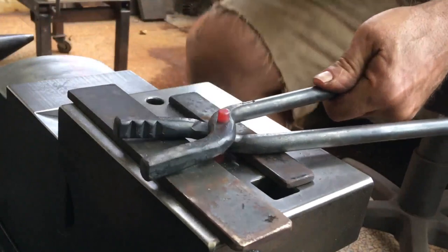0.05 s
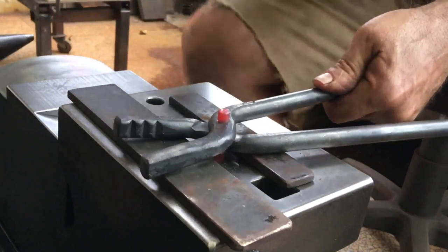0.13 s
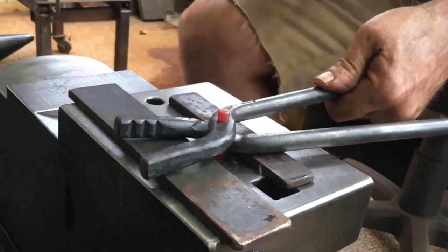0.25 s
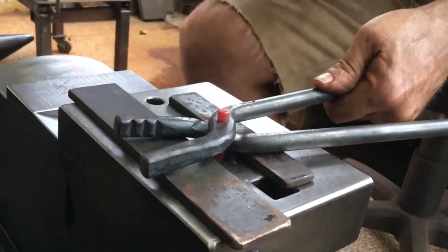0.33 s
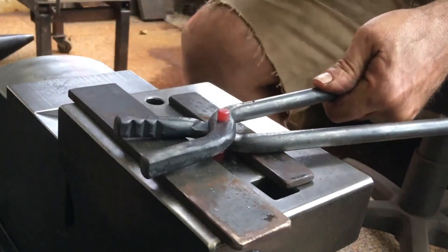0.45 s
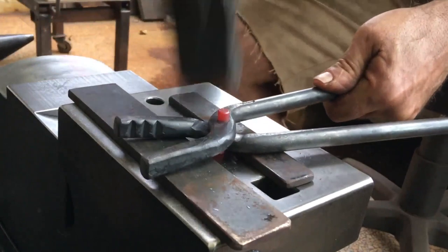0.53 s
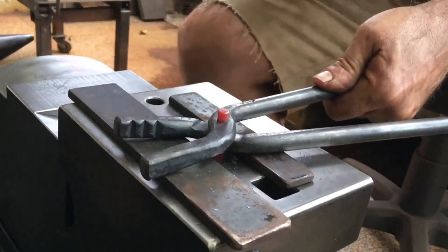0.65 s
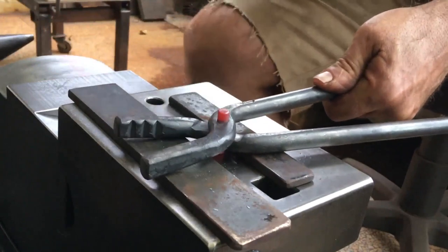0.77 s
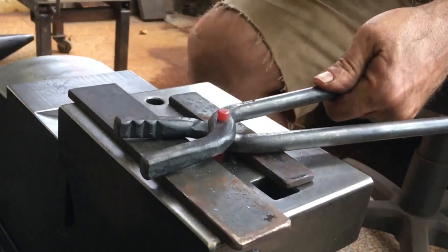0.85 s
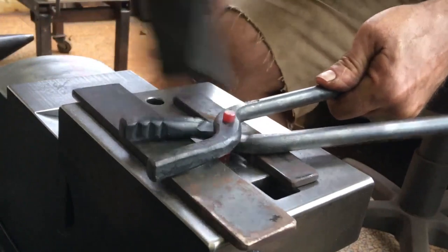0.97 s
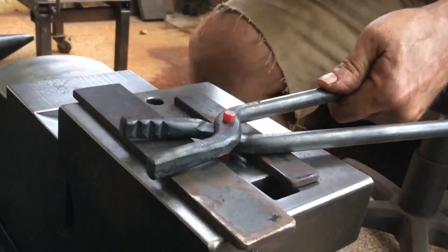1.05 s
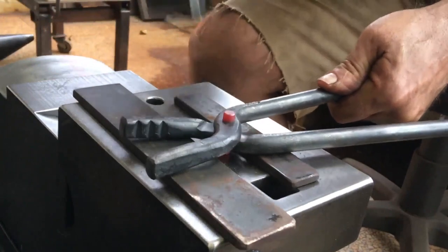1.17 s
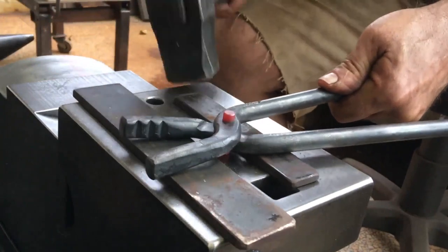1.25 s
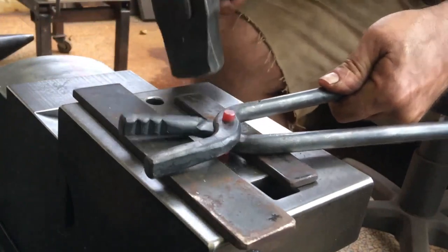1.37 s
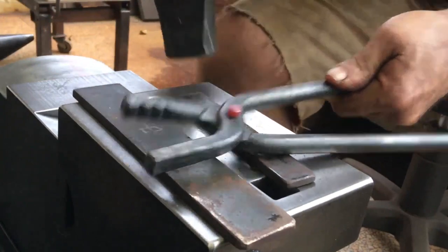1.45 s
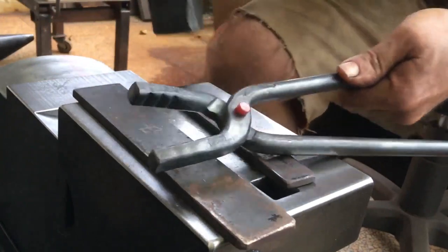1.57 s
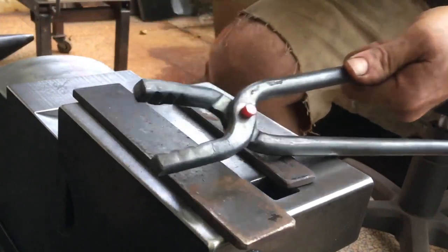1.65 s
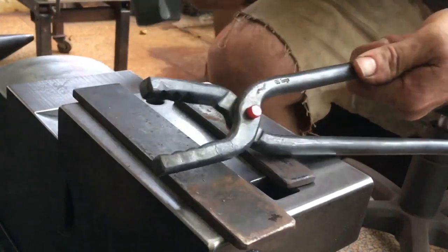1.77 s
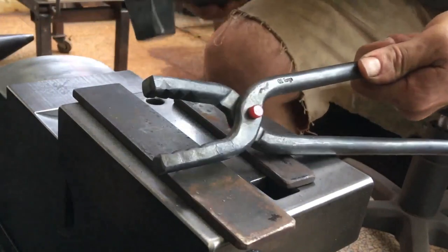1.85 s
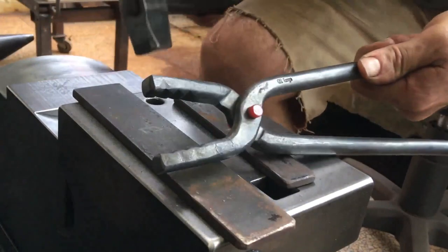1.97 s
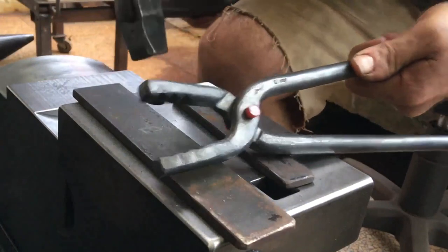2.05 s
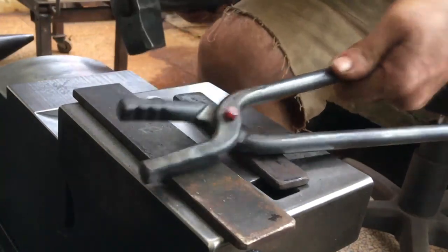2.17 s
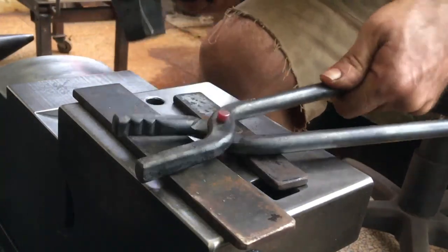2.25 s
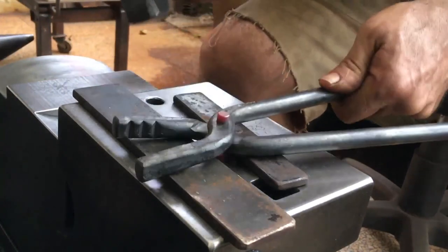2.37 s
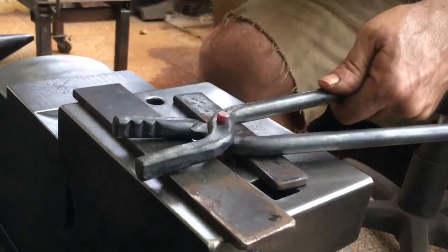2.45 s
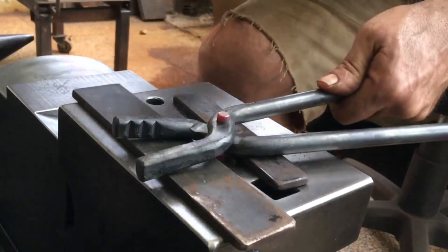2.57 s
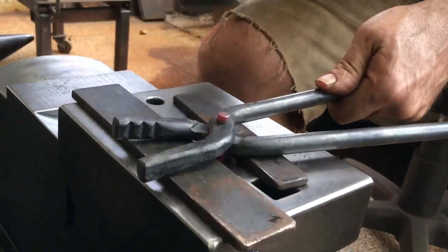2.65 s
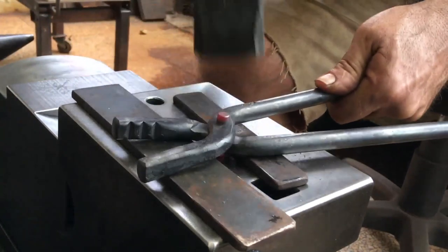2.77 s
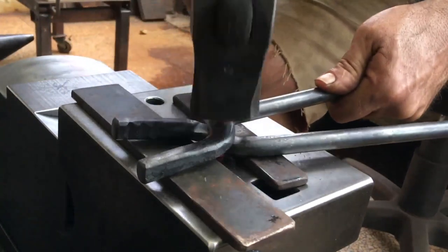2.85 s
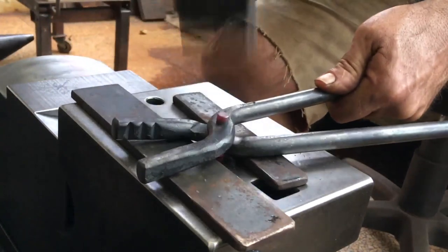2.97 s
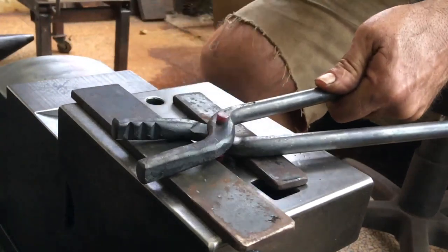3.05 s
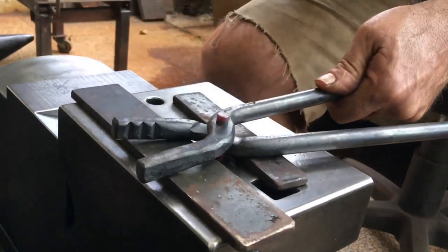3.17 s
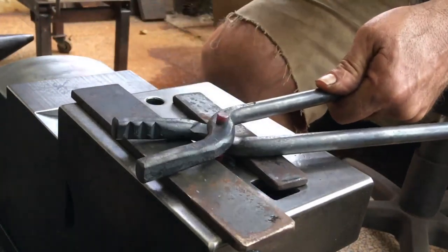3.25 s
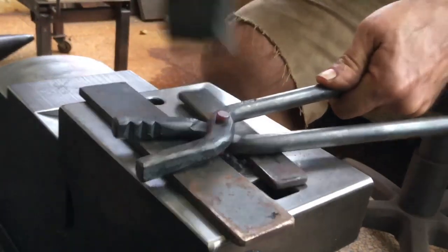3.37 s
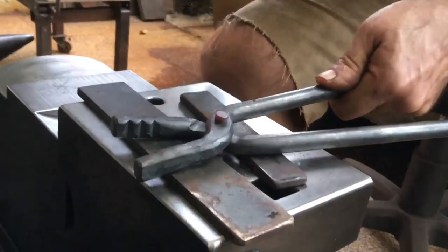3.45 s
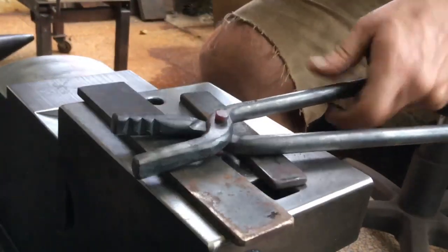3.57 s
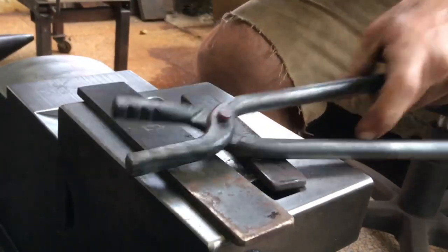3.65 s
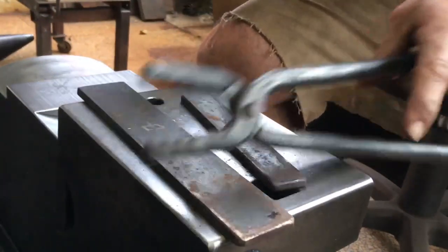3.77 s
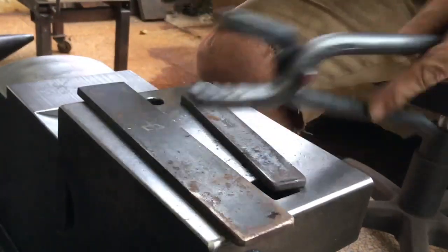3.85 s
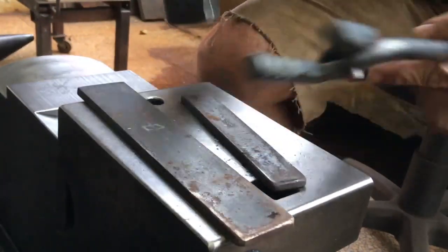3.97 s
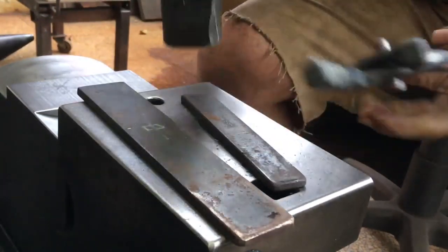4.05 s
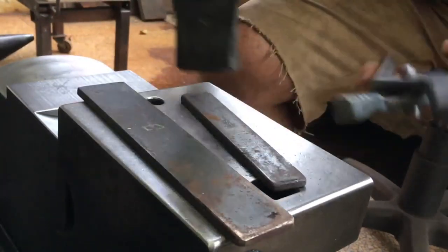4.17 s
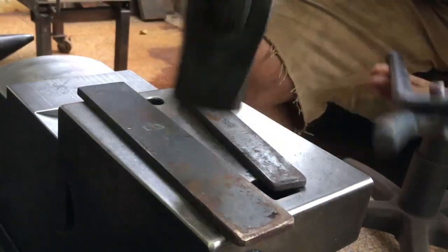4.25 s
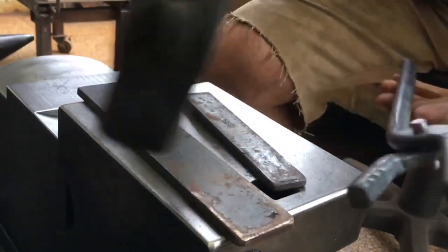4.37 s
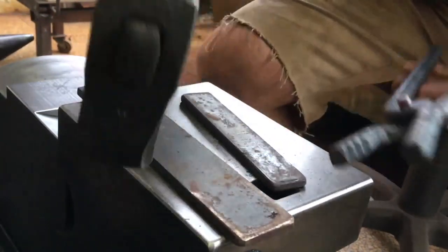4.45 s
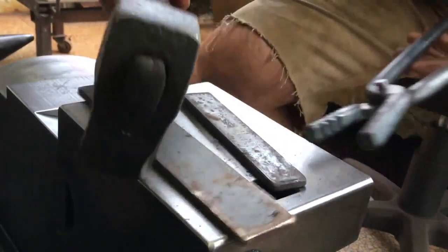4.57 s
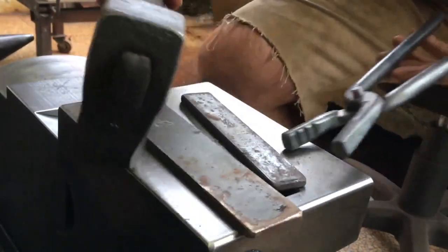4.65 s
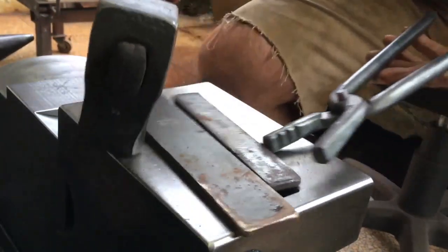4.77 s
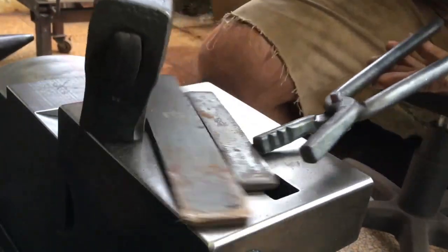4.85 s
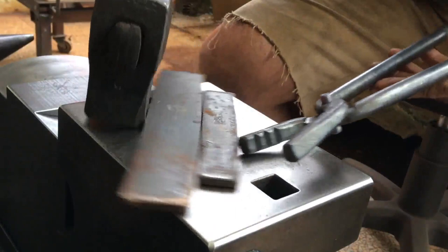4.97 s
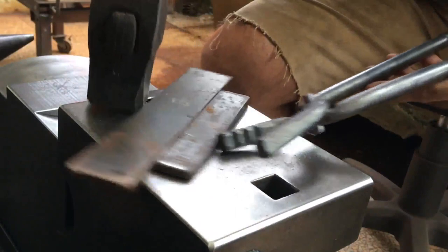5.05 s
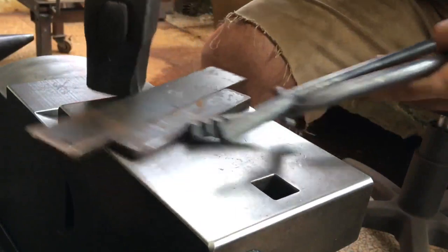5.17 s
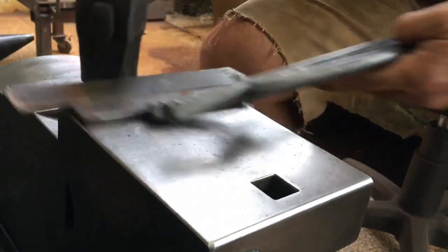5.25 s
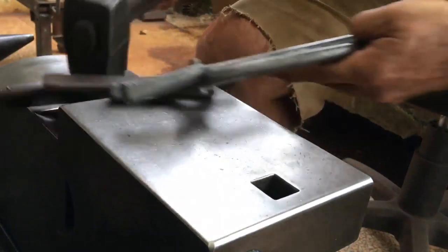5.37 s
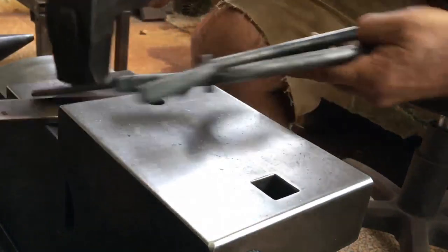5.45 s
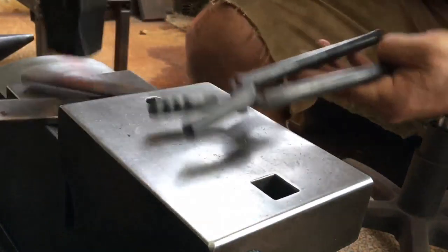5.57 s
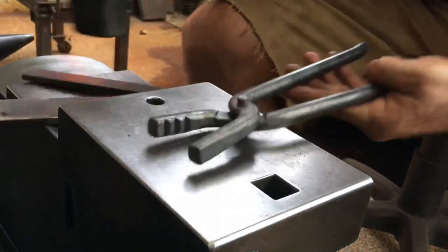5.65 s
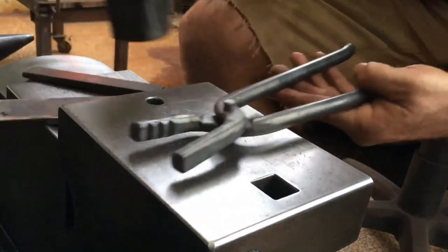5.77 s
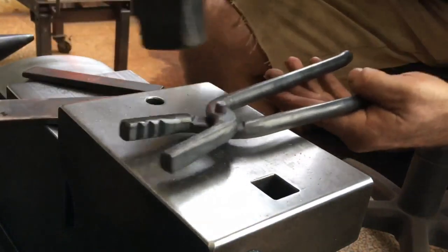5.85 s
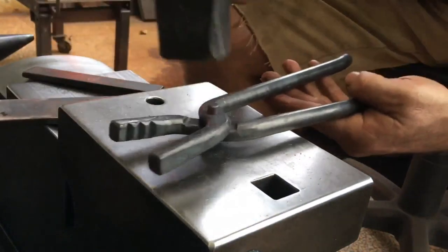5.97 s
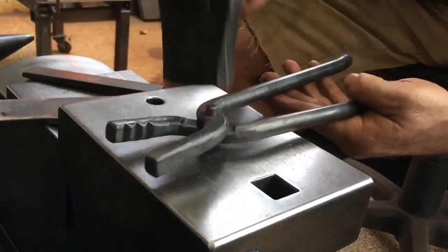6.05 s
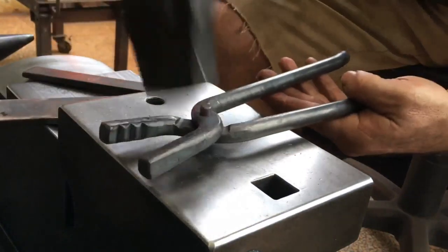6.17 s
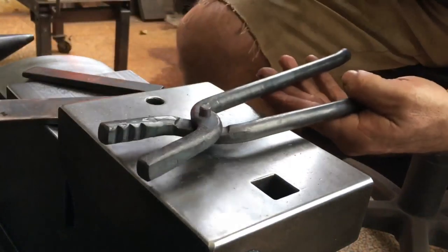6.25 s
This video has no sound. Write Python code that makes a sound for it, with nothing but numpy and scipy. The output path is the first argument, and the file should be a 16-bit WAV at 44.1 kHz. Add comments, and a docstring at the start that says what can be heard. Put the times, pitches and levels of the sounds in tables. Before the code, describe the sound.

Spaced hammer blows crack and clang on a steel anvil, two of them overloading, then flat bars scrape and tongs clatter down over a low forge hum.

```python
"""In a smithy, a smith hammers steel tongs on an anvil, pushes two flat bars aside and lays the tongs down.
Each blow is coloured noise for crack, rebound and thud of the stand, plus decaying modes of the anvil.
Handled steel clicks, bounces, grinds and sings; a forge behind is a noise rush and a resonant hum.
The hardest blows overload the microphone, and gain control ducks the hum, which swells back slowly."""
import sys
import numpy as np
from scipy import signal
from scipy.fft import rfft, irfft
from scipy.io import wavfile
from scipy.ndimage import uniform_filter1d, minimum_filter1d

SR = 44100
rng = np.random.default_rng(int(sys.argv[2]) if len(sys.argv) > 2 else 0)


def wav_record(signal):
    """Record a signal, one row per channel, as 16-bit PCM in the file named by sys.argv[1]."""
    frames = np.transpose(np.atleast_2d(signal))
    bounded = np.clip(frames, -1, 1)
    # unit amplitude maps onto the largest positive 16-bit level
    quanta = np.round(bounded * 32767).astype(np.int16)
    wavfile.write(sys.argv[1], SR, quanta)


N = 278271
TIME = np.arange(N) / SR  # [s]

# click of a light contact: (frequency [Hz], relative level [dB per Hz])
CLICK_SPECTRUM = [(200, -23), (1000, -4), (2000, -2.5), (3400, 1.5), (5000, 3), (8000, -4), (11000, -8),
                  (15500, -14)]


def gain_of(db):
    """Level law: amplitude is ten to the power of a twentieth of the decibels."""
    return 10 ** (np.asarray(db) / 20)


def evened(x):
    """Power normalization: scales a signal to rms 1."""
    return x / np.sqrt(np.mean(x ** 2) + 1e-20)


def read(points, hz):
    """Interpolation of a curve along a logarithmic frequency axis."""
    f, value = np.transpose(points)
    return np.interp(np.log(hz + 1), np.log(f + 1), value)


def add(mix, s, sound):
    """Superposition: adds a sound to the mix from time s [s]."""
    part = mix[max(round(s * SR), 0):][:len(sound)]
    part += sound[:len(part)]


def coloured(x, spectrum):
    """Spectral shaping: weights each frequency of x by a spectrum, then scales to rms 1."""
    hz = np.fft.rfftfreq(len(x), 1 / SR)
    weight = gain_of(read(spectrum, hz))
    return evened(irfft(rfft(x) * weight, len(x)))


def burst(spectrum, t60, rise):
    """Impact noise: one second of coloured noise with a fast onset and exponential decay (times in s)."""
    t = TIME[:SR]
    noise = coloured(rng.standard_normal(SR), spectrum)
    return noise * gain_of(-60 * t / t60) * (1 - np.exp(-t / rise))


def drift(hz):
    """Low-pass noise: smooth random motion of rms 1, up to about hz changes a second."""
    f = np.fft.rfftfreq(N, 1 / SR)
    return evened(irfft(rfft(rng.standard_normal(N)) / (1 + (f / hz) ** 4), N))


def workshop(x, first=0.006):
    """Reverberation: dense reflections later than first [s], each frequency band dying at its own speed."""
    # decay of the room: (frequency [Hz], t60 [s])
    room_decay = [(150, 0.1), (1000, 0.12), (4000, 0.18), (9000, 0.18), (16000, 0.13)]
    hz, t, z = signal.stft(rng.standard_normal(SR), SR, nperseg=256)
    decay = gain_of(-60 * t / read(room_decay, hz)[:, None])
    tail = signal.istft(z * decay, SR, nperseg=256)[1][:SR]
    tail = tail * (TIME[:SR] > first)
    return signal.fftconvolve(x, tail / np.linalg.norm(tail))[:N]


def forge(rush_db=-34, hum_db=-1, flutter_db=2):
    """Broadband turbulence and resonance: a steady rush of burning gas and a fluttering hum."""
    # burning gas: (frequency [Hz], relative level [dB per Hz])
    rush_spectrum = [(18, -41.5), (36, -3), (70, -10.5), (130, -3.5), (195, -6.5), (376, -16), (554, -21.5),
                     (680, -20), (885, -31.5), (1490, -30), (1750, -37.5), (3510, -40), (4630, -49.5),
                     (10300, -53), (11300, -45), (16000, -48)]
    # resonances: (centre [Hz], full width at half amplitude [Hz], level before hum_db and flutter [dB])
    hum_resonances = [(68, 7.8, -43), (106.8, 5.5, -43), (185.3, 24, -34.5), (241.6, 6.5, -43),
                      (336, 6.5, -58.5), (638, 18, -47.5), (746, 77, -54.5), (9630, 120, -73.5)]
    hz = np.fft.rfftfreq(N, 1 / SR)
    rush = gain_of(rush_db) * coloured(rng.standard_normal(N), rush_spectrum)
    hum = np.zeros(N)
    for centre, width, db in hum_resonances:
        response = 1 / (1 + (2 * (hz - centre) / width) ** 2)
        hum += gain_of(db) * evened(irfft(rfft(rng.standard_normal(N)) * response, N))
    return rush + hum * gain_of(hum_db + flutter_db * drift(hz=12))


def ring(body, length, waver=0.24, waver_hz=22, tilt_db=0):
    """Modal decay: pressed steel shortens a body's modes by the factor length and makes them beat."""
    # anvil: (frequency [Hz], t60 at length 1 [s], then relative level struck in the
    #         middle [dB], at the edge [dB], at the far end [dB])
    anvil_modes = [(2247, .3, -19, 6, -24), (2277, .4, -14, -8, -15), (4335, .35, -7, -26, -13),
                   (4391, .5, -7, -15, -1), (4455, .22, -8, -30, -14), (5002, .48, -14, -7, -11),
                   (5383, .25, -15, -24, -18), (7203, .38, -10, -5, -7), (7743, .5, -5, -3, -12),
                   (7797, .35, -4, -20, -18), (9610, .35, -14, -19, -8), (9735, .25, -7, -30, -20),
                   (10635, .35, -11, -14, -16), (10735, .35, -5, -9, -14), (10862, .35, -5, -20, -9),
                   (11020, .22, -8, -30, -20), (14072, .38, -3, -17, -12), (14600, .38, -6, -20, -16),
                   (14677, .22, -4, -32, -24), (15547, .27, -8, -30, -6)]
    # flat steel bar, tongs, and hammer head nudging the bars:
    # (frequency [Hz], t60 at length 1 [s], relative level [dB])
    bar_modes = [(4670, .2, -24), (6850, .3, -16), (8554, .4, -25), (9650, .15, -18), (11023, .3, 0),
                 (13110, .65, -18), (14310, .5, -28)]
    tongs_modes = [(1243, 0.072, -18), (1796, 0.23, -8), (3540, 0.09, -9.5), (4860, 0.12, 0),
                   (6020, 0.21, -17), (6870, 0.21, 0), (7840, 0.16, -17), (9500, 0.1, 1),
                   (11700, 0.11, -15), (13700, .15, -20.5), (14300, 0.47, -18), (14900, .2, -7)]
    head_modes = [(3270, .2, 0), (3570, .12, -7), (5900, .08, -6), (8554, .25, -8), (11700, .08, -14)]
    bodies = {"bar": bar_modes, "tongs": tongs_modes, "head": head_modes}
    for k, place in enumerate(("middle", "edge", "far end")):
        bodies[place] = [(m[0], m[1], m[2 + k]) for m in anvil_modes]
    hz, t60, db = np.transpose(bodies[body])[:, :, None]
    size = gain_of(db + tilt_db * np.log2(hz))  # tilt in dB per octave
    size = size / np.sqrt(np.sum(size ** 2) / 2)
    t = TIME[:SR]
    turns = hz * t + rng.random(hz.shape)
    split = waver_hz * rng.standard_normal(hz.shape)  # contact splits each mode into a close pair
    pairs = np.sin(2 * np.pi * turns) + waver * np.cos(2 * np.pi * (turns + split * t))
    decay = gain_of(-60 * t / (t60 * length))
    return (size * decay * pairs).sum(0) * (1 - np.exp(-t / 0.0011))


def contacts(per_s, spread_db):
    """Random impulse process: tiny impacts of uneven size at random moments, at rms 1."""
    size = gain_of(spread_db * np.minimum(rng.exponential(1, N), 3))
    sign = rng.choice([-1, 1], N)
    return evened(size * sign * (rng.random(N) < per_s / SR))


def slide(edge_db=-4, end_db=-6, middle_db=-5, tongs_db=-9, damped=0.22, rattle_db=-10, tilt_db=1):
    """Friction excitation: slips of dragged steel grind, rattle and keep anvil and tongs singing."""
    # first the bars, then the tongs: (held from [s], held until [s], grinding level [dB],
    #                                  singing level [dB], swell [dB/s], fade [dB/s])
    drags = [(5.388, 5.481, -39, -48, 55, 302), (5.563, 5.752, -40.5, -17, 301, 183)]
    # slips, and loose steel chattering on the face: (frequency [Hz], relative level [dB per Hz])
    grind_spectrum = [(300, -8.5), (800, -6), (1250, -8), (1700, -10.5), (2300, -32), (3200, -25.5),
                      (6000, -27), (15000, -48.5)]
    rattle_spectrum = [(500, -18.5), (1400, -19), (2500, 12), (3500, 2.5), (6000, -2), (9000, -10.5),
                       (15000, -19.5)]
    grinding, singing = np.zeros((2, N))
    for start, end, grind_db, sing_db, swell, fade in drags:
        effort_db = -swell * np.maximum(start - TIME, 0) - fade * np.maximum(TIME - end, 0)
        grinding += gain_of(grind_db + effort_db)
        singing += gain_of(sing_db + effort_db)
    slips = contacts(per_s=2000, spread_db=5.5)
    body = gain_of(tongs_db) * ring("tongs", 0.36)
    for place, db in (("edge", edge_db), ("far end", end_db), ("middle", middle_db)):
        body += gain_of(db) * ring(place, damped, tilt_db=tilt_db)
    sung = signal.fftconvolve(slips * singing, body / np.linalg.norm(body))[:N]
    chatter = coloured(contacts(per_s=220, spread_db=6), rattle_spectrum)
    rattle = gain_of(rattle_db) * chatter * singing
    grind = coloured(slips, grind_spectrum) * grinding
    return sung + rattle + workshop(rattle + grind)  # the grinding is heard by reflection only


def knocks(choke_db_per_s=130, room_db=-7, tilt_db=1.5):
    """Light impact: a click that the room returns, and the touched body's ring, buzzing on loose steel."""
    # (time [s], click level [dB], ring level [dB], ring length factor [ratio],
    #  bounce gap [s], 0 if it stays down, what rings [name])
    touches = [(1.9166, -43, -58, .2, 0.0032, "middle"), (2.2943, -48, -61, .2, 0.00032, "tongs"),
               (2.428, -21, -30, 0.1, 0.02, "middle"), (4.704, -19.5, -12.5, 0.21, 0.0025, "middle"),
               (4.7616, -25.5, -35.5, 0.62, .0245, "head"), (4.8644, -37, -36.5, 0.83, 0.0043, "middle"),
               (4.878, -25, -24.5, 0.22, 0.0016, "tongs"), (4.9183, -21.5, -23, 0.67, 0.004, "bar"),
               (5.4797, -9, -3.5, 0.98, 0.00043, "edge"), (5.535, -5.5, -4.5, 0.92, 0.00066, "edge"),
               (5.588, -20, 4.5, 0.75, .006, "far end"), (5.6886, -4, 2, 0.56, 0.0078, "middle"),
               (5.7644, -13, -1, 0.74, 0.0048, "middle"), (5.8113, -18, -20, 1.3, 0.0051, "tongs"),
               (6.196, -11, -18, 0.6, 0.0022, "tongs"), (6.2168, -24.5, -32, 0.53, 0.0013, "head")]
    settled_s = 5.78  # the tongs come to rest on the face and choke its ring
    bounce_db = -5.5  # each bounce against the one before
    buzz, buzz_hz = 0.25, 260  # rms depth [ratio], fastest change [Hz]
    clicks, rings = np.zeros((2, N))
    for s, click_db, ring_db, length, gap, body in touches:
        choke_db = -choke_db_per_s * np.maximum(s + TIME[:SR] - settled_s, 0) * (s < settled_s)
        for k in range(3 if gap > 0 else 1):
            moment, loss_db = s + k * gap, k * bounce_db
            click = burst(CLICK_SPECTRUM, t60=0.017, rise=0.0001)
            add(clicks, moment, gain_of(click_db + loss_db) * click)
            touched = ring(body, length, tilt_db=tilt_db)
            add(rings, moment, gain_of(ring_db + loss_db + choke_db) * touched)
    return clicks + gain_of(room_db) * workshop(clicks) + rings * (1 + buzz * drift(buzz_hz))


def low_thump(hz=56, t60=0.068):
    """Damped oscillation: a low thump just after a hard blow, as the overload recovers."""
    t = TIME[:SR]
    return np.sin(2 * np.pi * hz * t) * gain_of(-60 * t / t60) * (1 - np.exp(-t / 0.022))


def hammer(pressed=0.17, free=0.81, thump_db=3, chatter_db=-1, second_clang_db=-6):
    """Impact and rebound: the face cracks and chatters; the anvil clangs while pressed, then rings faintly."""
    # (time [s], force [dB], thud [dB], after-ring [dB], rebound delay [s],
    #  rebound against the first crack [dB], place where the anvil rings on [name])
    blow_list = [(0.0293, -7, -12, -41.5, 0.011, -8, "middle"), (0.2981, -5, -7, -37.5, 0.013, 5, "middle"),
                 (1.072, 10, 3.5, -13, 0.012, 4, "middle"), (2.9857, -2.5, -22, -37, .012, -6, "edge"),
                 (3.4555, 14.5, 5, -17.5, 0.03, 5.5, "far end")]
    # crack of the face, thud of the stand, and broad low noise of a hard blow that overloads
    # the microphone: (frequency [Hz], relative level [dB per Hz])
    crack_spectrum = [(100, -10), (600, -19), (1100, -11), (1900, -29), (2600, 0), (3700, -4.5),
                      (4400, 7.5), (6500, -1.5), (7800, 0.5), (9000, 1.5), (10900, 8), (12800, -5.5),
                      (15500, 6)]
    thud_spectrum = [(25, -28.5), (70, -10.5), (150, -0.5), (300, -12), (500, -23.5), (1100, -22),
                     (2000, -29.5), (5000, -46)]
    low_noise_spectrum = [(20, -5), (50, 11.5), (100, -13), (400, -4.5), (1200, -8), (2200, -18.5),
                          (5000, -22)]
    # growth with force of clang, low noise and lead sound:
    # (level at a force of 0 dB [dB], slope [dB per dB of force])
    clang_law = (-4.5, 1.63)
    low_noise_law = (-16, 2.7)
    lead_law = (-40.5, 0.95)
    lead_s = 0.022  # a faint tick and ring sound just ahead of every blow
    low_noise_top_db = 17  # upper limit of the hard blows' low noise
    brightening = 0.1  # harder blows favour the high modes [dB per octave for each dB of force]
    out = np.zeros(N)
    for s, force_db, thud_db, after_db, delay, rebound_db, place in blow_list:
        clang, low_noise, lead = (gain_of(db + slope * force_db)
                                  for db, slope in (clang_law, low_noise_law, lead_law))
        low_noise = min(low_noise, gain_of(low_noise_top_db))
        lead_sound = burst(CLICK_SPECTRUM, t60=0.023, rise=0.00013) + ring("middle", pressed)
        add(out, s - lead_s, lead * lead_sound)
        # crack, chatter, rebound
        for lag, db in ((0, 0), (delay / 2, chatter_db), (delay, rebound_db)):
            add(out, s + lag, gain_of(force_db + db) * burst(crack_spectrum, t60=0.054, rise=0.0019))
        add(out, s, clang * ring("middle", pressed))
        add(out, s, gain_of(after_db) * ring(place, free, waver=0.67, waver_hz=7.9))
        second_clang = ring(place, pressed, tilt_db=brightening * force_db)
        add(out, s + delay, clang * gain_of(rebound_db + second_clang_db) * second_clang)
        add(out, s, gain_of(thud_db) * burst(thud_spectrum, t60=0.15, rise=0.0086))
        add(out, s, low_noise * burst(low_noise_spectrum, t60=0.11, rise=0.0019))
        add(out, s + delay, low_noise * gain_of(thump_db) * low_thump())
    return out


def scene(room_db=-7):
    """Superposition of the forge, the handled steel, and the blows with their reflections."""
    blows = hammer()
    return (blows + gain_of(room_db) * workshop(blows) + knocks() + slide() + forge())[None]


def held(x, hold):
    """Peak hold: the highest value of the last hold seconds."""
    span = max(int(hold * SR), 2)
    return -minimum_filter1d(-x, span, origin=(span - 1) // 2, mode="constant")


def cut_db(x, limit_db, hold, recovery):
    """Fast limiting: the excess in dB is cut at once, held, then let go exponentially (times in s)."""
    power_db = 10 * np.log10(abs(uniform_filter1d(x ** 2, size=220)) + 1e-12)
    excess_db = held(np.maximum(power_db - limit_db, 0), hold)
    fade = np.exp(-TIME / recovery)
    return np.maximum.accumulate(excess_db / fade) * fade


def duck_db(x, limit_db, average, hold, release_db_per_s):
    """Loudness levelling: excess of averaged power is cut, held, then given back at a steady rate."""
    keep = np.exp(-1 / (average * SR))
    power_db = 10 * np.log10(signal.lfilter([1 - keep], [1, -keep], x ** 2) + 1e-12)
    excess_db = held(np.maximum(power_db - limit_db, 0), hold)
    released = release_db_per_s * TIME
    return np.maximum.accumulate(excess_db + released) - released


def gain_control(x):
    """Dynamic compression: the deeper of a quick and a slow cut applies, and stray peaks are clipped."""
    quick = cut_db(x, limit_db=-12.5, hold=0.2, recovery=0.13)
    slow = duck_db(x, limit_db=-12.0, average=0.22, hold=0.47, release_db_per_s=20.5)
    reduction_db = uniform_filter1d(np.maximum(quick, slow), size=40)
    return np.clip(x / gain_of(reduction_db), -0.53, 0.53)


def record(dry, ceiling_db=14.0, lopsided=0.29):
    """Asymmetric saturation: the microphone overloads unevenly; gain control and the band limit follow."""
    ceiling = gain_of(ceiling_db)
    driven = ceiling * (np.tanh(dry[0] / ceiling + lopsided) - np.tanh(lopsided))
    low_cut = signal.butter(2, 38, "high", fs=SR, output="sos")
    driven = signal.sosfilt(low_cut, driven)
    band_limit = signal.firwin(401, 15950, window=("kaiser", 8), fs=SR)  # low-pass edge in Hz
    return signal.oaconvolve(gain_control(driven), band_limit, "same")[None]


dry = scene()
out = record(dry)
wav_record(out)
```